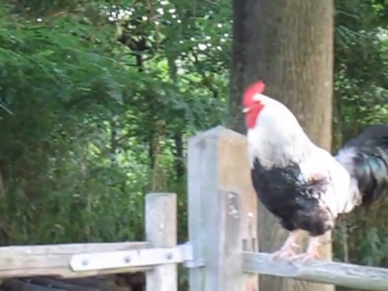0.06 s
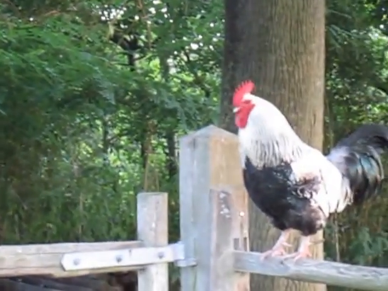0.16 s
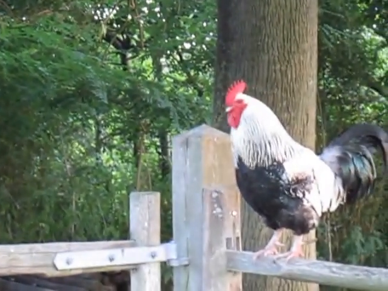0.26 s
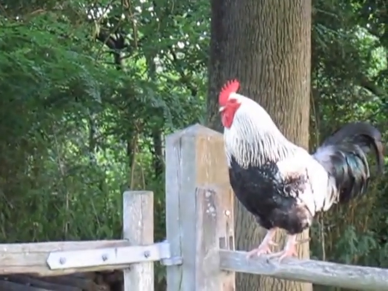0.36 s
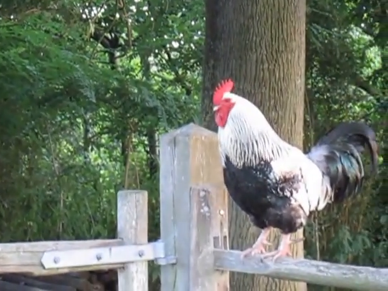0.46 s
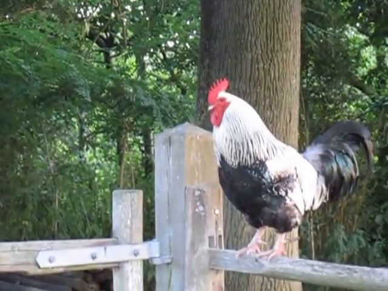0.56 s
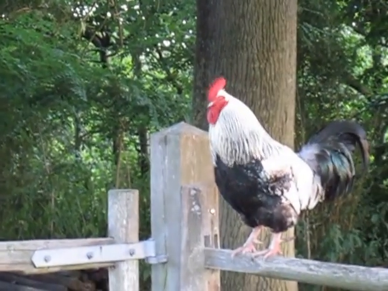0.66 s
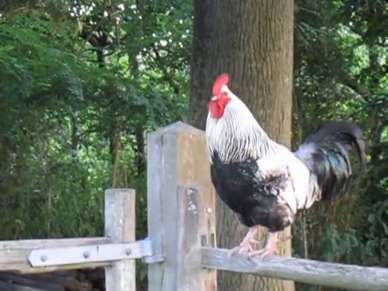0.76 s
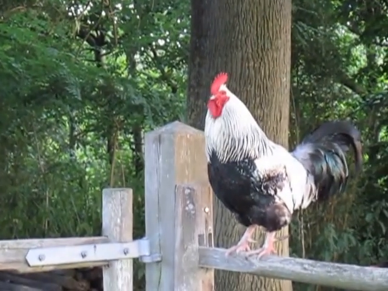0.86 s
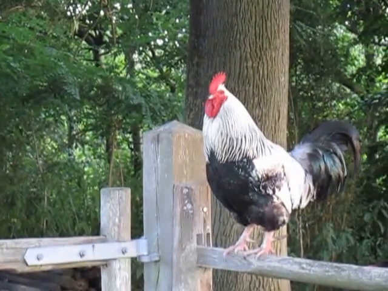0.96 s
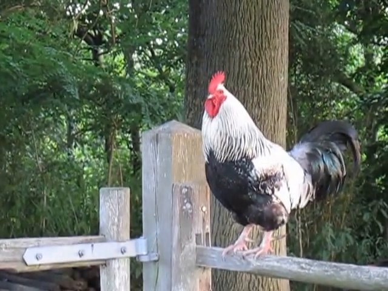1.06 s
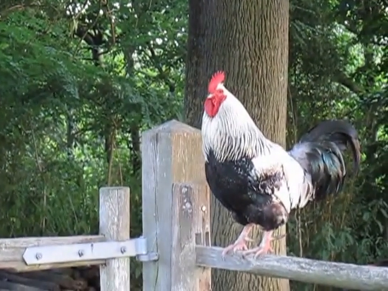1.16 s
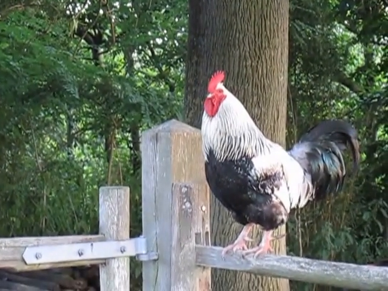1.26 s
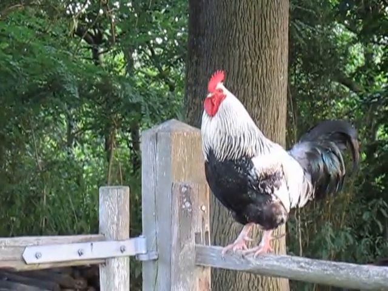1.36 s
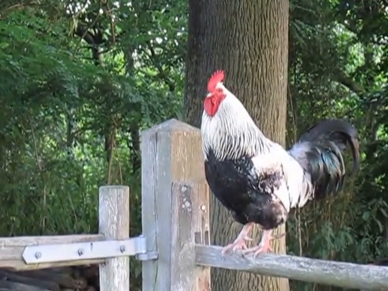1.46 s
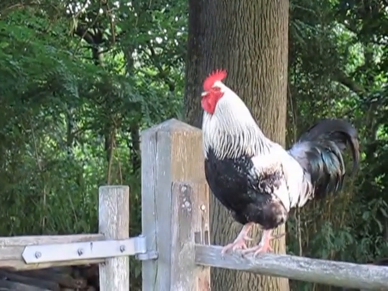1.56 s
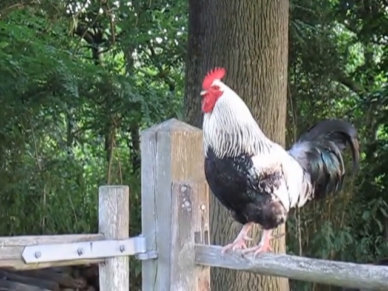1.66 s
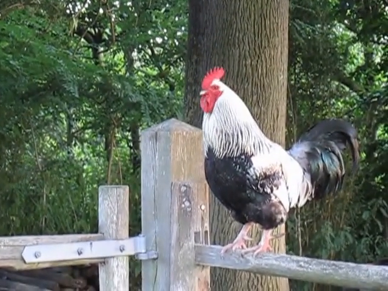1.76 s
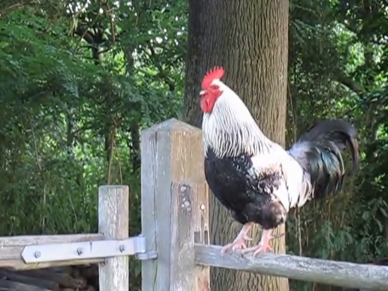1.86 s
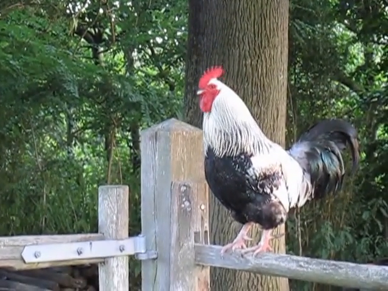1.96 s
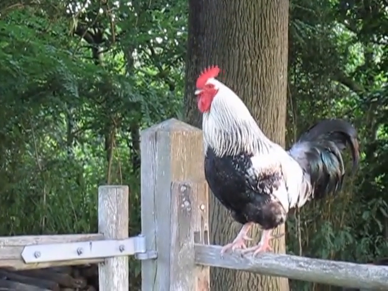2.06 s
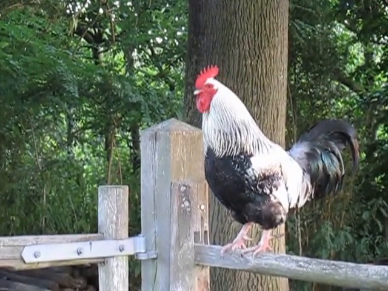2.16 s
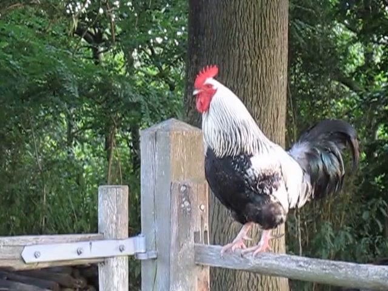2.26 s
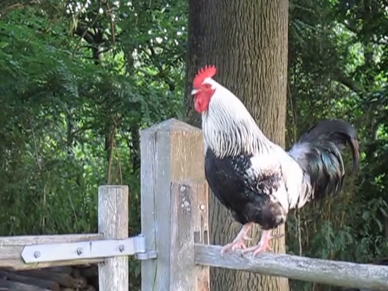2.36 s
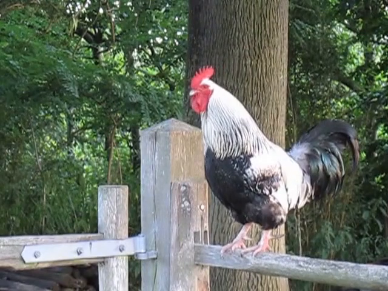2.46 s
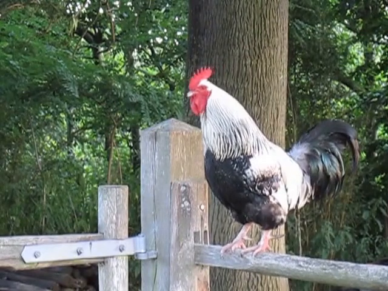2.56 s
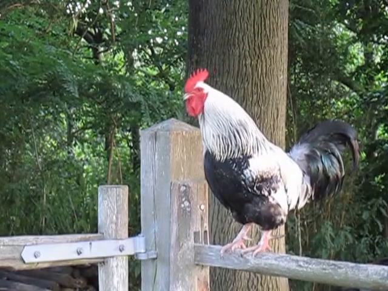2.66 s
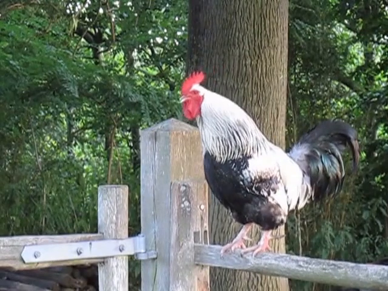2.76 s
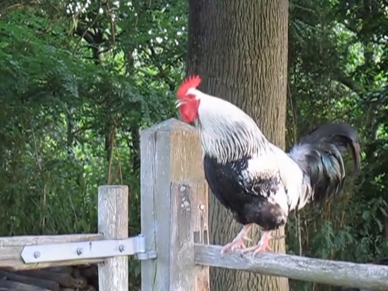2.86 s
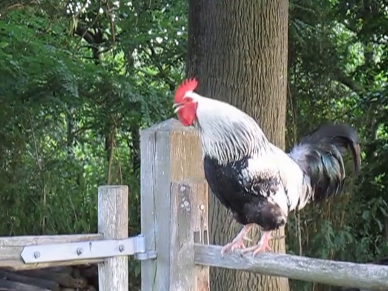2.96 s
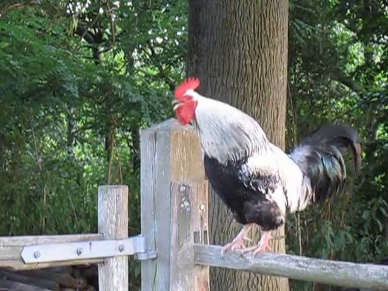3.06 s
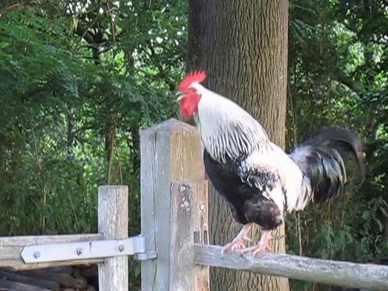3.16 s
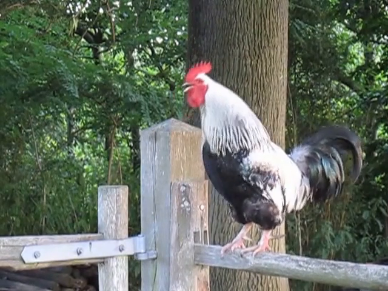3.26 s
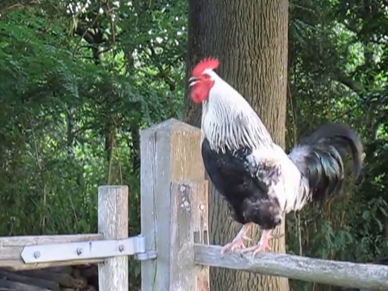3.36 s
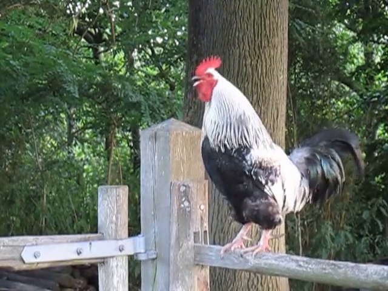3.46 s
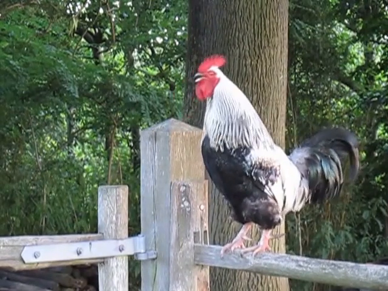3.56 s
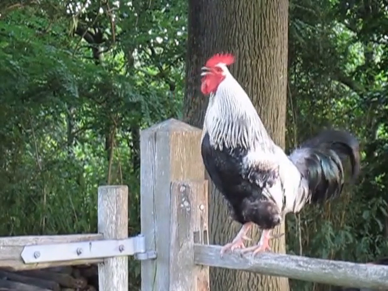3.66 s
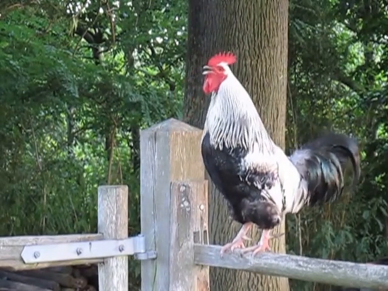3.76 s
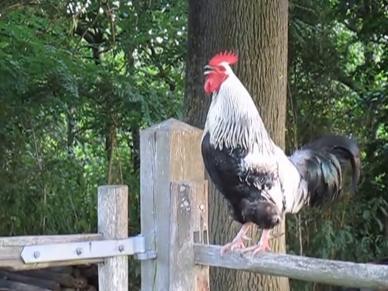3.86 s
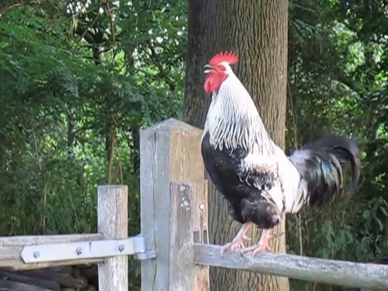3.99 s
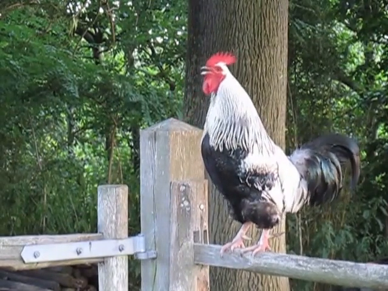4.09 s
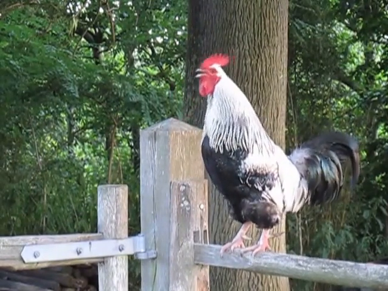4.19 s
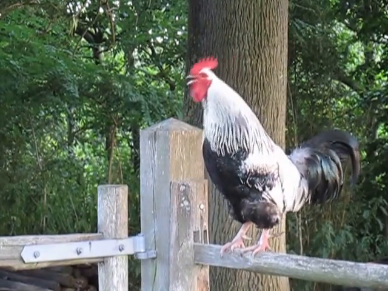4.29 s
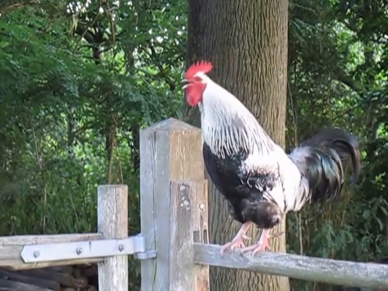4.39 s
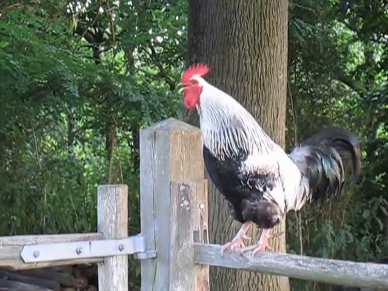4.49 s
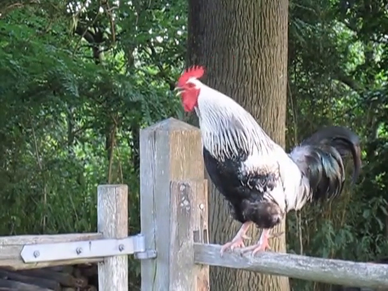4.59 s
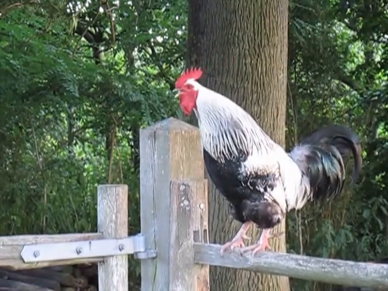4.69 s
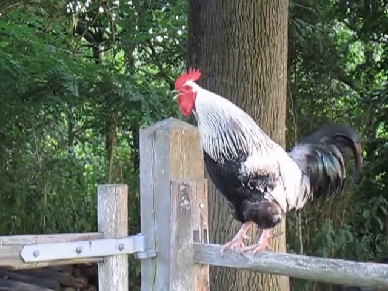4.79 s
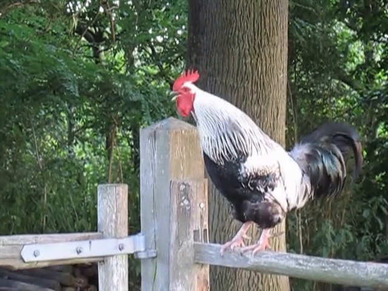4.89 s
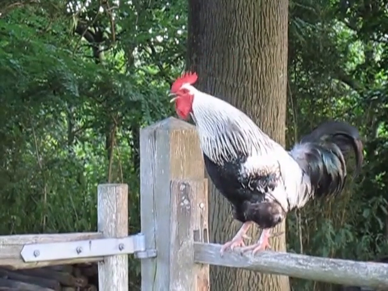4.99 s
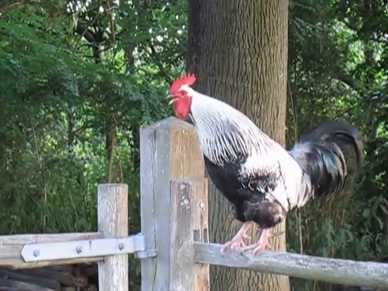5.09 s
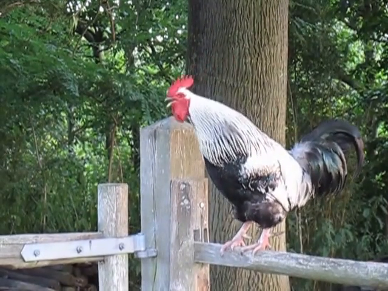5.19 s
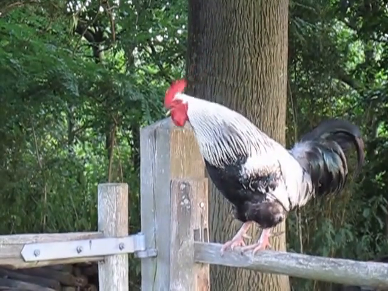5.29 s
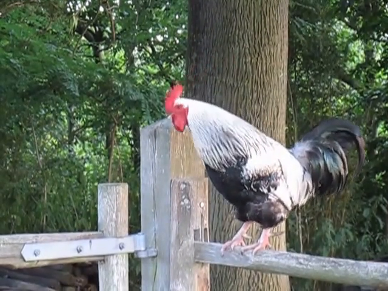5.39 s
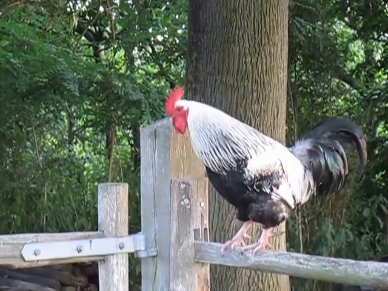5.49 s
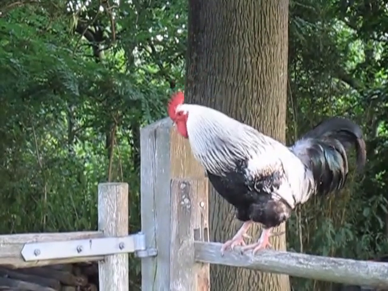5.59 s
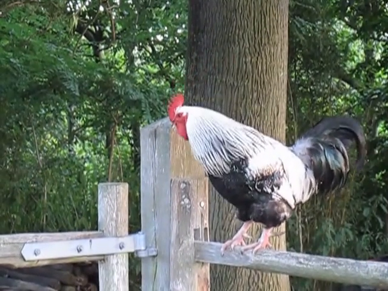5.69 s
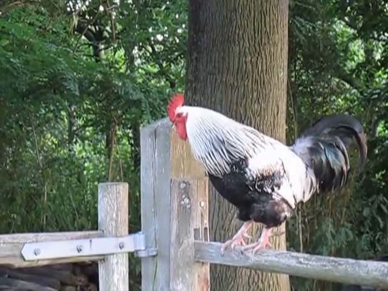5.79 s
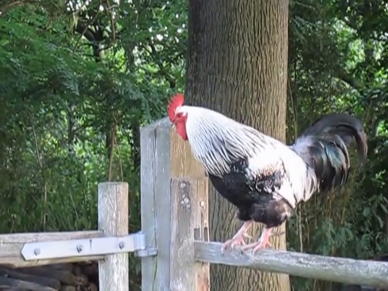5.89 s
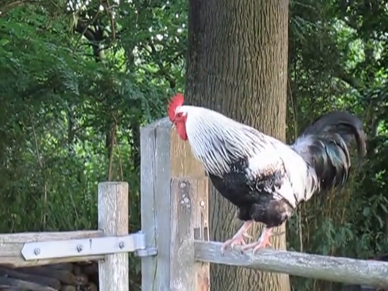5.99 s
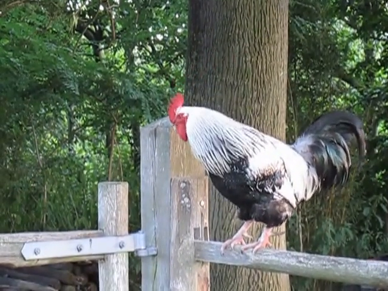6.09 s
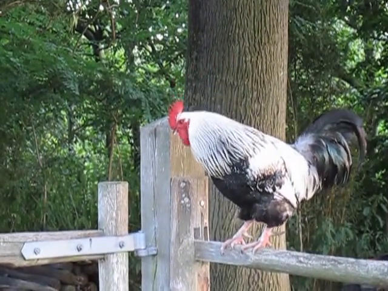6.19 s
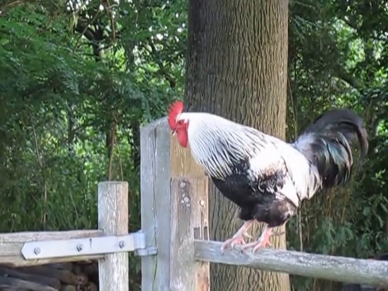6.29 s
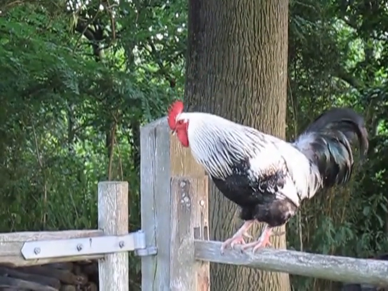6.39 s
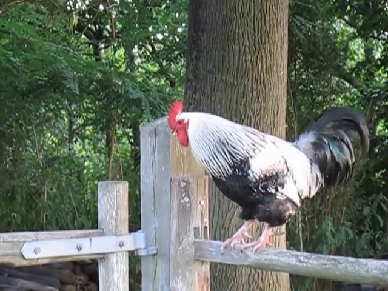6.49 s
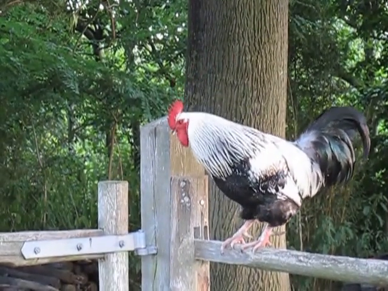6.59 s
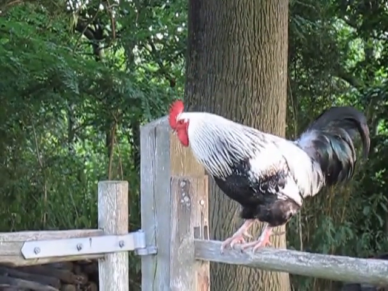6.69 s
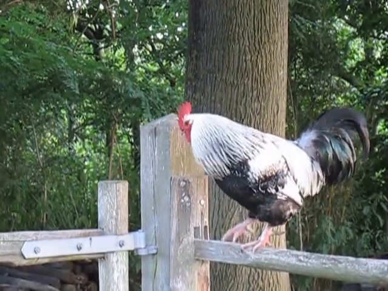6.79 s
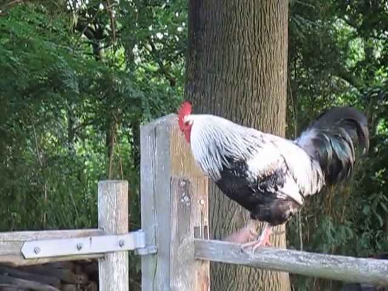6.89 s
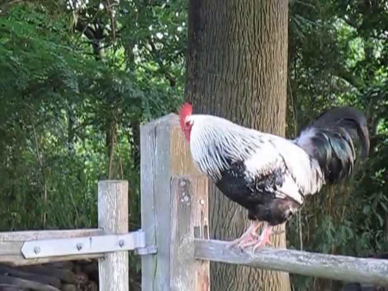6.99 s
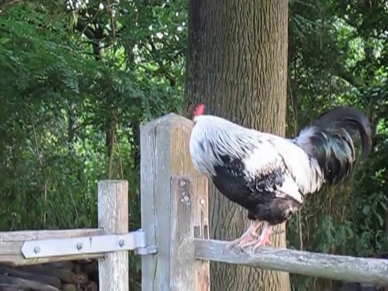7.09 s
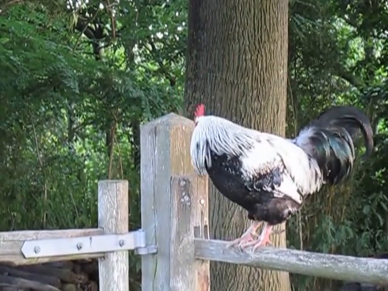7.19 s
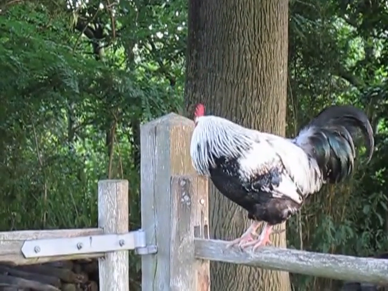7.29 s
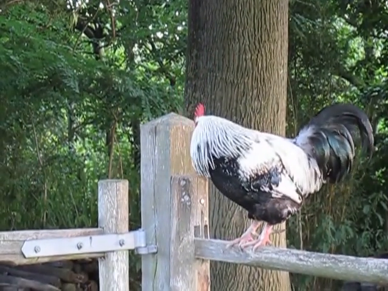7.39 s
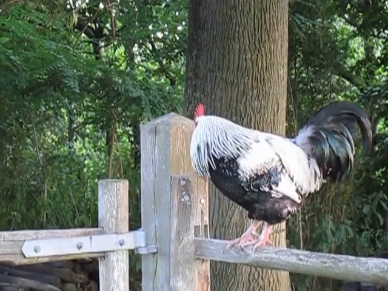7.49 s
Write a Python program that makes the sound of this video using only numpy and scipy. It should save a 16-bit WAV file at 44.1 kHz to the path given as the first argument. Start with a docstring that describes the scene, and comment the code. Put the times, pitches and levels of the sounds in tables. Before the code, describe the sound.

For the first three seconds, soft wind moves through trees, with a low rush and leafy hiss swelling in several gentle gusts. A distant road and a very faint, high electrical whine run underneath throughout. At about 3.1 seconds a rooster crows once, close by and far louder than everything else. Two short, hoarse, broken notes lead at 3.6 seconds into a long, clear, held note. It flutters briefly, cracks slightly around 4.2 seconds, sinks a little in pitch and cuts off with a rough catch at 5.4 seconds. The trees give a faint, short echo. A second thin electrical tone enters around 5.2 seconds, creeping upward and fading. From about 6.6 to 7 seconds, feathers rustle quietly and feet scuff and bump on a wooden rail. One more small tap comes at 7.5 seconds over the dying breeze.

```python
"""A rooster crows from a gate

Close by, at the edge of a wood, he crows once: short broken notes, then a long held one.
His voice box (the syrinx) jumps between a hoarse low voice and a clear high one, and his throat
changes shape as he stretches and sinks. Trees echo him faintly; afterwards he shuffles on the
wooden rail. Behind him are wind in the leaves, a far road and a thin electrical whine."""
import sys
import numpy as np
from scipy import signal
from scipy.fft import rfft, irfft, next_fast_len
from scipy.io import wavfile
from scipy.ndimage import uniform_filter1d

SR = 44100
rng = np.random.default_rng(int(sys.argv[2]) if len(sys.argv) > 2 else 0)


def pcm_store(signal):
    """Save signal as 16-bit PCM."""
    levels = np.round(np.clip(np.atleast_2d(signal), -1, 1) * 32767)
    wavfile.write(sys.argv[1], SR, levels.astype(np.int16).T)


N = 332778
T = np.arange(N) / SR

# One push of air per syllable, in the hoarse voice: start/s, end/s, attack/s, release/s, pitch/Hz,
# pitch fall/Hz, pitch sag at weak pressure/Hz, roughness (0-1), level/dB
AIR_PUSHES = [(3.082, 3.272, 0.032, 0.0613, 621.7, 60, 16, .25, 0),
              (3.366, 3.544, 0.018, .028, 591, -15.5, 50, 0.55, 3),
              (3.554, 5.376, .047, .026, 611.6, 16.5, 110, 0.11, .5)]
# Times when long and short voice pulses take turns most strongly: start/s, end/s
LIMPING_SPANS = [(3.08, 3.13), (5.342, 5.378)]
# The voice has three bands: low (the pitch itself), main (the windpipe's ring) and upper (overtones).
# Base levels of the hoarse voice: low/dB, main/dB, upper/dB
HOARSE_LEVELS = (-23, -21.5, -26)
# Change as the air runs out: low/dB, main/dB, upper/dB
WEAK_AIR_CHANGE = (-23.5, -6, -11.5)
# Jumps into the clear voice and back: up/s, jump length/s, down/s, drop length/s,
# time the throat takes to open/s, extra roughness at the start (0-1)
CLEAR_NOTES = [(3.39, 0.0042, 3.504, 0.016, 0.37, 0.24), (3.62, 0.0085, 5.333, .024, 0.0079, 0.08)]
# Pitch of the short and the long clear note: t/s, f/Hz
SHORT_PITCH = [(3.393, 749.5), (3.432, 799.5), (3.495, 750)]
LONG_PITCH = [(3.626, 735.7), (3.76, 732), (3.982, 737), (4.07, 731), (4.14, 742), (4.278, 720.5),
              (4.391, 718), (4.54, 705.5), (4.739, 703.3), (4.921, 697.6), (5.081, 690.2), (5.26, 681),
              (5.319, 661.4)]
# Base levels of the same two notes: t/s, low/dB, main/dB, upper/dB
SHORT_LEVELS = [(3.40, -21, -13.5, -34), (3.45, -22.5, -13, -35.5), (3.495, -21, -18, -26.5)]
LONG_LEVELS = [(3.65, -21, -14.5, -30), (3.762, -23, -13, -29.5), (3.832, -19.5, -16, -31.5),
               (4.168, -23.5, -13.5, -25.5), (4.206, -17.5, -18.5, -32), (4.238, -21, -14.5, -32.5),
               (4.356, -20, -15.5, -34), (4.444, -19.5, -17.5, -31.5), (4.514, -22, -17.5, -35),
               (4.66, -24, -28.5, -30), (4.814, -23.5, -20, -27), (5.174, -26.5, -21.5, -25),
               (5.202, -26, -26, -23.5), (5.33, -24.5, -15, -31.5)]
# What each brief catch in the voice adds: t/s, half length/s, pitch/Hz, roughness, main/dB, upper/dB
CATCHES = [(3.103, 0.023, 0, 0.13, -0.5, 0.5), (3.419, 0.01, 30.5, 0.53, -5.5, 8.5),
           (3.506, 0.0069, -11, 0.33, -9, -4.5), (4.202, .024, -15.5, 0, -1, -2),
           (5.356, 0.012, -4.5, 0.35, -9, 1.5)]
# Flutters of the voice box: strongest beat/s, beat rate/Hz, fade/s, pitch lift (share), swing/dB
FLUTTERS = [(3.155, 49, .07, .04, 7), (3.85, 37.7, .085, .095, -2.5)]
# How throat and beak colour the overtones in each posture: f/Hz, level/dB
CROUCHED = [(1120, -49), (1900, -1), (2490, -28), (3000, 0.5), (3300, -6.5), (4080, -9.5), (4740, -25),
            (5850, -2), (6850, -8), (7410, -12), (7810, -10), (11000, -11), (11700, -22), (13000, -22),
            (15500, -44)]
PRESSED = [(1000, -39), (1700, -27), (1880, 4), (2080, 9), (2530, -17.5), (2830, -14.5), (4620, -17),
           (5060, -4.5), (6200, -26.5), (7000, -10.5), (9760, -24), (10600, -18), (11600, -35),
           (13100, -23), (15500, -54)]
STRETCHED = [(1120, -34), (1900, -10), (3080, 1), (3740, -5.5), (4120, -1), (4410, -7.5), (4780, -17),
             (5220, 2.5), (5700, -21.5), (7480, -14), (8910, -11.5), (11700, -37), (12300, -25.5),
             (14200, -31), (15500, -70)]
LEANING = [(1120, -52), (1900, -14.5), (2610, -6), (2900, 6), (3300, 9), (3640, 1), (4690, -4.5),
           (5080, 5.5), (5360, -87), (5800, 11.5), (6160, -18), (8760, 5), (11400, -8.5), (13100, -5),
           (15500, -29)]
SUNK = [(1120, -53), (1900, -44), (2330, 12), (2820, 0.5), (3030, -40), (3540, -12), (3800, -30),
        (5260, -20.5), (6550, -15.5), (7090, 2.5), (7480, -25), (8990, -6.5), (11800, -35), (12800, -9.5),
        (15500, -95)]
SLACK = [(1120, -63), (1900, -16), (2040, -31), (2350, -66), (2720, 5), (3840, -38), (4080, -16.5),
         (4490, -38), (6380, -10.5), (6910, -1), (7680, -29), (9650, -15.5), (11600, -26), (13100, -28),
         (15500, -53)]
CLOSING = [(940, -42), (1600, -22), (1710, 13.5), (2210, -22), (2480, -11), (2910, 5), (3420, -16),
           (4340, -13), (4820, -46), (5830, -13.5), (9370, -11), (10800, -26), (11800, -38), (12900, -26),
           (15500, -44)]
# He stretches, then sinks as his air runs out: middle of the move/s, length/s, new posture
NECK_MOVES = [(3.319, 0.074, STRETCHED), (4.218, 0.084, LEANING), (4.564, 0.41, SUNK), (5.001, 0.22, SLACK),
              (5.277, 0.079, CLOSING)]
# Echoes from post, ground and trunks: delay/s, level/dB
ECHOES = [(.0017, -12.5), (.0046, -9.5), (.0113, -10), (.047, -11.5), (.083, -16.5)]
# Feet and feathers on the rail: t/s, f/Hz, width/Hz, peak level/dB, decay/s
SCUFFS = [(6.645, 7700, 6000, -52, 0.045), (6.749, 1000, 600, -39, 0.004), (6.748, 4500, 5000, -45, 0.0073),
          (6.755, 8240, 4000, -54.5, 0.31), (6.762, 220, 200, -37.5, 0.0056),
          (6.774, 1010, 900, -38.5, .002), (6.833, 5500, 7000, -42.5, 0.011),
          (6.84, 8500, 4500, -35, 0.0012), (6.841, 200, 200, -46, 0.0092),
          (6.905, 10500, 5000, -37.5, 0.00083), (6.949, 13000, 3000, -46, .001),
          (7.501, 925, 700, -44, 0.0058)]
# The wind's low roar, its rush in the treetops and its hiss in near leaves: f/Hz, level/dB
WIND_ROAR = [(15, -57), (25, -31), (40, -13), (96, -5), (152, -8), (210, -1.5), (304, -0.5), (344, -3.5),
             (451, -4.5), (480, -3.5), (620, -35), (1060, -120)]
TREETOP_RUSH = [(280, -17.5), (480, -4), (603, -3.5), (801, -1), (1170, -1.5), (1380, -5), (1970, -9.5),
                (2100, -10), (2730, -14), (4620, -120)]
LEAF_HISS = [(1180, -63), (2000, -11.5), (2140, -25.5), (2990, -3.5), (4360, -9), (5050, -9), (6520, -14.5),
             (9930, -11.5), (10800, -15), (11900, -37), (12500, -28.5), (13700, -31), (15500, -33)]
# The dying breeze, one row each for roar, rush and hiss: starting level/dB, change/(dB per s)
BREEZE = [(-56.5, -.5), (-44, -0.68), (-54, -0.44)]
# Gusts in the trees: peak/s, rise/s, fall/s, roar/dB, rush/dB, hiss/dB
GUSTS = [(.74, 0.15, 0.39, -46, -46, -54), (1.4, 0.49, 0.5, -43.5, -36.5, -45),
         (2.1, 0.3, 0.37, -46, -62, -70), (2.54, 0.12, 0.48, -40, -41, -44),
         (3.08, 0.3, 0.64, -41.5, -36.5, -51)]
# An electrical tone that creeps upward: t/s, f/Hz, level/dB
RISING_WHINE = [(5.2, 9920, -51), (5.5, 10000, -60), (6.2, 10520, -63.5), (7.1, 10800, -70),
                (7.5, 10900, -90)]


def rooster(jump_rough=0.045, flutter_rough=3.4):
    """Pulses from the voice box ring in the windpipe, throat and beak."""
    pressure, hoarse_hz, hoarse_rough, push_db = air_pushes()
    clear, opened, clear_rough = clear_voice()
    catch_hz, catch_rough, catch_main_db, catch_upper_db = catches()
    lift, swing_db, dull_db = flutter()
    clear_hz, = curves(SHORT_PITCH + LONG_PITCH)
    hz = hoarse_hz + clear * (clear_hz - hoarse_hz) + catch_hz
    # The voice scrapes halfway through a jump and on each flutter beat.
    mid_jump = uniform_filter1d(4 * clear * (1 - clear), size=300)
    rough = hoarse_rough + clear * (clear_rough - hoarse_rough) + jump_rough * mid_jump + catch_rough
    pulses = voice_box(hz * (1 + lift), rough + flutter_rough * lift)
    low_db, main_db, upper_db = band_levels(clear, pressure, push_db)
    low, main = windpipe(pulses, hz, rough)
    voice = low * undb(low_db) + main * undb(main_db + catch_main_db)
    voice += throat(pulses, opened) * undb(upper_db + catch_upper_db + dull_db)
    voice += voice_crack(pulses)
    return voice * undb(swing_db) * during([row[:2] for row in AIR_PUSHES])


def voice_box(hz, rough, jitter=0.07, waver=0.00134, shimmer=0.26, air=0.0094, rasp=0.98, count=27):
    """Thin membranes snap shut in pulses, each with a puff of air; a hoarse voice pulses unevenly."""
    hz = hz * (1 + jitter * rough * wander(257.8) + waver * wander(30))
    phase = 2 * np.pi * np.cumsum(hz) / SR
    # Long and short pulses take turns, which adds tones halfway between the overtones.
    uneven = rough + during(LIMPING_SPANS)
    phase += 0.18 * uneven * np.sin(phase / 2)
    drift = undb(2.73 * wander(7) + 0.34 * wander(60))  # slow swell and quick flicker
    pulses = 0
    for k in range(1, count):
        # Closing takes a moment, so the overtones do not peak together.
        tone = np.cos(k * phase + np.pi * k * k / count) * (k * hz < SR / 2)
        pulses += tone * np.roll(drift, k * N // count)  # each drifts on its own
    strong_then_weak = 0.65 * uneven * np.cos(phase / 2)
    pulses *= 1 + rough * shimmer * wander(332) + strong_then_weak
    puffs = (air + rasp * rough) * noise() * (1 + np.cos(phase))
    return pulses + puffs


def air_pushes(weak_rough=0.263):
    """Air pressure rises, holds and falls in each syllable; weak air makes the voice flat and rough."""
    rows, pressure = [], 0
    for start, end, attack, release, hz, fall_hz, *rest in AIR_PUSHES:
        rows += [(start, hz, *rest), (end, hz - fall_hz, *rest)]
        pressure += np.clip(np.minimum((T - start) / attack, (end - T) / release), 0, 1)
    hz, sag_hz, rough, db = curves(rows)
    weak = 1 - pressure
    return pressure, hz - sag_hz * weak, rough + weak_rough * weak, db


def clear_voice(settled_rough=0.044, settle_s=0.049):
    """The voice jumps from hoarse (0) to clear (1); the throat opens and the roughness settles."""
    clear, opened, rough = 0, 0, settled_rough
    for up, jump, down, drop, opening, start_rough in CLEAR_NOTES:
        note = ramp(up, jump) * (1 - ramp(down, drop))
        clear += note
        opened += note * ramp(up + opening / 2, opening)
        rough += note * start_rough * np.exp(-abs(T - up) / settle_s)
    return clear, opened, rough


def catches():
    """The voice box stumbles, briefly shifting pitch, roughness and the main and upper levels."""
    return sum(np.outer(shifts, np.exp(-((T - s) / length) ** 2)) for s, length, *shifts in CATCHES)


def flutter(dull_db_per_lift=-80):
    """The membranes flutter: each beat lifts the pitch, swings the level and dulls the overtones."""
    lift, swing_db = 0, 0
    for s, rate, fade, share, db in FLUTTERS:
        beats = np.cos(np.pi * rate * (T - s)) ** 4 * np.exp(-abs(T - s) / fade)
        lift += share * beats
        swing_db += db * (beats - uniform_filter1d(beats, size=1100))
    dull_db = dull_db_per_lift * (lift - uniform_filter1d(lift, size=1100))
    return lift, swing_db, dull_db


def band_levels(clear, pressure, push_db, flare_db=6):
    """The three bands follow the air pressure and the switch between hoarse and clear."""
    clear_levels = curves(SHORT_LEVELS + LONG_LEVELS)
    low_db, main_db, upper_db = (
        clear * clear_db + (1 - clear) * (hoarse_db + push_db) + (1 - pressure) * weak_db
        for clear_db, hoarse_db, weak_db in zip(clear_levels, HOARSE_LEVELS, WEAK_AIR_CHANGE))
    # The low band flares as an upward jump sweeps the pitch through the windpipe's lowest ring.
    flare = sum(np.exp(-((T - up - jump / 2) / jump) ** 2) for up, jump, *_ in CLEAR_NOTES)
    return low_db + flare_db * flare, main_db, upper_db


def windpipe(pulses, hz, rough, dark_pitch_hz=574, bright_pitch_hz=754):
    """The windpipe rings in two bands; the main one brightens with pitch and roughness."""
    low = resonance(pulses, hz=708, width_hz=396, order=4)
    dark = resonance(pulses, hz=1246, width_hz=420, order=4)
    bright = resonance(pulses, hz=1514, width_hz=370, order=4)
    blend = np.clip((hz - dark_pitch_hz) / (bright_pitch_hz - dark_pitch_hz) + 1.23 * rough, 0, 1)
    return steady(low), steady(blend * bright + (1 - blend) * dark)


def throat(pulses, opened):
    """Throat and beak glide from one posture to the next, colouring the overtones."""
    def held(posture):
        return steady(colour(pulses, posture), size=1500)
    voice = held(CROUCHED)
    for s, length, posture in NECK_MOVES:
        new = held(posture)
        if posture == STRETCHED:  # the neck stays pressed until a clear note opens it
            new = opened * new + (1 - opened) * held(PRESSED)
        voice += ramp(s, length) * (new - voice)
    return steady(voice)


def voice_crack(pulses, at_s=4.215, half_length_s=0.038, db=-32):
    """The voice cracks as the neck starts to sink, and a shrill ring flares."""
    shrill = steady(resonance(pulses, hz=4700, width_hz=1400, order=3))
    return shrill * undb(db) * np.exp(-((T - at_s) / half_length_s) ** 2)


def tree_echoes(crow, treble_hz=2500, tail_db=-18, fade_s=0.59, dull_hz=3200, delay_s=0.033):
    """Near, narrow surfaces return the treble; far trunks and leaves scatter a thin, duller tail."""
    def bounces(f):
        delayed = sum(undb(db) * np.exp(-2j * np.pi * f * s) for s, db in ECHOES)
        return delayed / (1 + (treble_hz / f) ** 4)
    tail = noise() * undb(-60 * T / fade_s) * (T > delay_s)
    tail /= np.sqrt(np.sum(tail ** 2))
    tail = shape(tail, lambda f: 1 / (1 + 1j * f / dull_hz))
    return shape(crow, bounces) + undb(tail_db) * signal.fftconvolve(crow, tail[:SR])[:N]


def shuffle(rise_share=0.75):
    """Feet and feathers scuff and bump as he shifts his weight; each sound rises faster than it dies."""
    out = 0
    for s, hz, width_hz, db, decay in SCUFFS:
        scuff = steady(resonance(noise(), hz, width_hz, order=2))
        swell = np.exp(-np.maximum(T - s, (s - T) / rise_share) / decay)
        out += scuff * undb(db) * swell
    return out


def wing_rustle(start_s=6.58, end_s=7.0, db=-58, patchy_db=3):
    """Wing feathers slide dryly over each other while he turns."""
    progress = np.clip((T - start_s) / (end_s - start_s), 0, 1)
    swell = np.sin(np.pi * progress) ** .5
    feathers = unit(resonance(noise(), hz=2700, width_hz=2600, order=2))
    return feathers * swell * undb(db + patchy_db * wander(40))


def wind(flicker_db=1.1, roundness=1.17):
    """Gusts swell over a dying breeze in the trees; roar, rush and hiss each flicker a little."""
    swells = [np.exp(-np.maximum((s - T) / rise, (T - s) / fall) ** roundness)
              for s, rise, fall, *_ in GUSTS]
    layers = zip((WIND_ROAR, TREETOP_RUSH, LEAF_HISS), BREEZE, np.transpose(GUSTS)[3:])
    out = 0
    for spectrum, (breeze_db, db_per_s), gust_dbs in layers:
        breeze_power = undb(breeze_db + db_per_s * T) ** 2
        gust_power = sum(swell * undb(db) ** 2 for swell, db in zip(swells, gust_dbs))
        air = unit(colour(noise(), spectrum))
        out += air * np.sqrt(breeze_power + gust_power) * undb(flicker_db * wander(11.1))
    return out


def road(db=-52, swell_db=1):
    """Tyres on a far road make a narrow, steady rush."""
    tyres = unit(resonance(noise(), hz=1030, width_hz=420, order=2))
    return tyres * undb(db + swell_db * wander(3.6))


def whine(steady_hz=5876, steady_db=-62.5, blur_hz=110):
    """Two faint electrical tones: one holds its pitch, the other starts late, blurred and rising."""
    hz, db = curves(RISING_WHINE)
    phase = 2 * np.pi * np.cumsum(hz + blur_hz * wander(135)) / SR
    rising = undb(db) * (T > RISING_WHINE[0][0]) * np.sin(phase)
    held = undb(steady_db) * np.sin(2 * np.pi * steady_hz * T)
    return np.sqrt(2) * (rising + held)  # makes the levels averages (rms), not peaks


def undb(db):
    """Turn decibels into a gain."""
    return 10 ** (np.asarray(db) / 20)


def curves(rows):
    """Join the points in each column of a table with straight lines in time."""
    s, *columns = np.transpose(rows)
    return [np.interp(T, s, column) for column in columns]


def ramp(s, length):
    """A straight rise from 0 to 1, centred on time s."""
    return np.clip((T - s) / length + .5, 0, 1)


def during(spans):
    """1 inside the spans and 0 outside, with soft edges."""
    return uniform_filter1d(sum(1. * (T > start) * (T < end) for start, end in spans), size=300)


def unit(x):
    """Scale to an average strength (rms) of 1."""
    return x / np.std(x)


def steady(x, size=400):
    """Even out the strength so that it stays near 1."""
    return x / np.sqrt(uniform_filter1d(uniform_filter1d(x * x, size), size) + 1e-12)


def shape(x, gain):
    """Turn each frequency f up or down by gain(f)."""
    size = next_fast_len(N + 8192)
    f = np.arange(size // 2 + 1) * SR / size + 1e-3
    return irfft(rfft(x, size) * gain(f), size)[:N]


def colour(x, spectrum):
    """Filter with a table of f/Hz, level/dB."""
    hz, db = np.transpose(spectrum)
    return shape(x, lambda f: undb(np.interp(np.log(f), np.log(hz), db, left=-120, right=-120)))


def resonance(x, hz, width_hz, order=1):
    """Keep a band around hz; a higher order cuts the rest more sharply."""
    return shape(x, lambda f: (1 + 1j * (f / hz - hz / f) * hz / width_hz) ** -order)


def noise():
    """White noise: an even hiss."""
    return rng.standard_normal(N)


def wander(rate):
    """A smooth random wobble of size about 1; a higher rate makes it quicker."""
    knots = unit(uniform_filter1d(rng.standard_normal(N // 8), size=4))
    return np.interp(T * rate * 8, np.arange(len(knots)), knots)


def scene():
    """The bird, his echo and the wood around him."""
    crow = rooster()
    return (crow + tree_echoes(crow) + shuffle() + wing_rustle() + wind() + road() + whine())[None]


def record(dry, low_cut_hz=48, dip_hz=11780, dip_width_hz=220, top_hz=15600):
    """The microphone drops the deep bass, a narrow band of high treble and the very top."""
    def microphone(f):
        dip = 1 - np.exp(-((f - dip_hz) / dip_width_hz) ** 2)
        return dip / np.hypot(1, (low_cut_hz / f) ** 3)
    top_cut = signal.ellip(8, .2, 70, top_hz, fs=SR, output="sos")
    return signal.sosfilt(top_cut, shape(dry[0], microphone))[None]


dry = scene()
out = record(dry)
pcm_store(out)
```